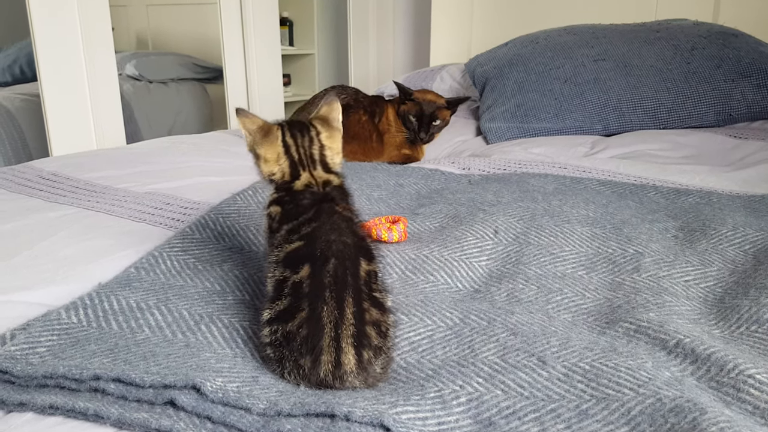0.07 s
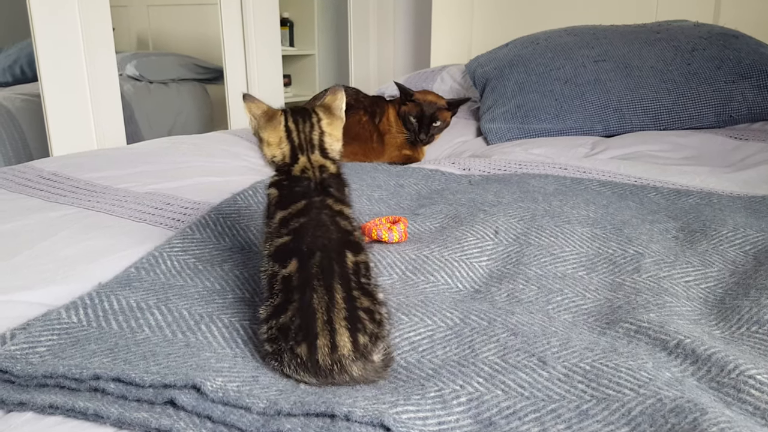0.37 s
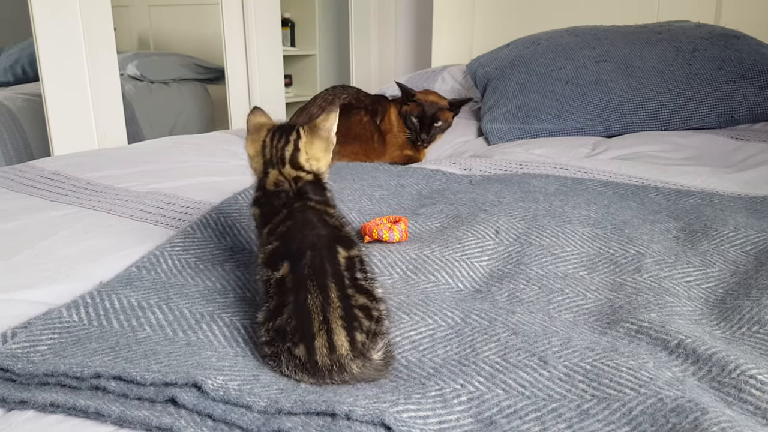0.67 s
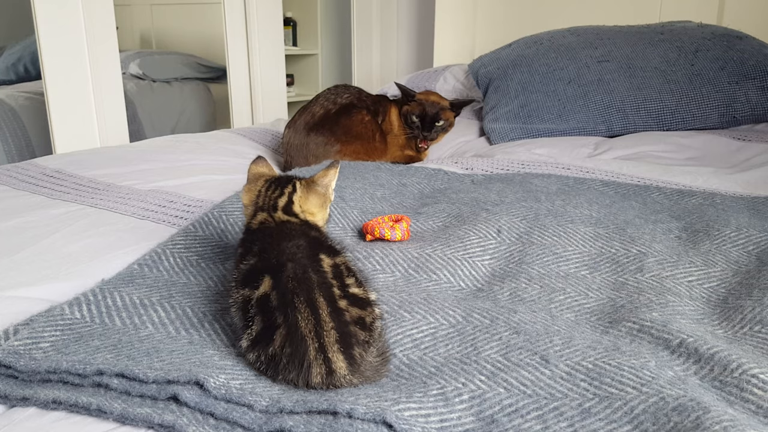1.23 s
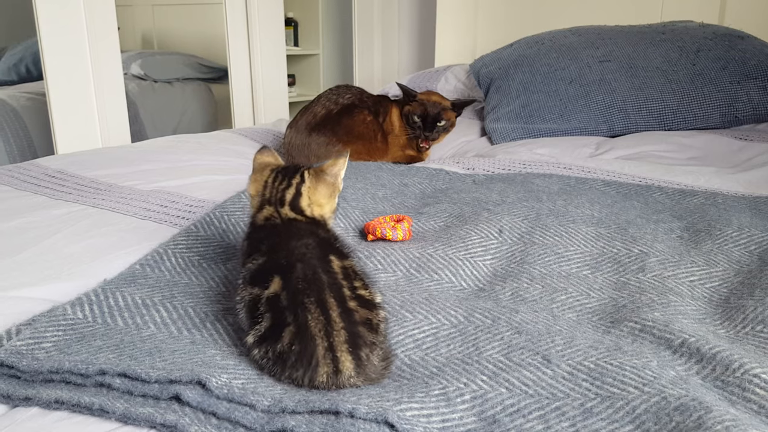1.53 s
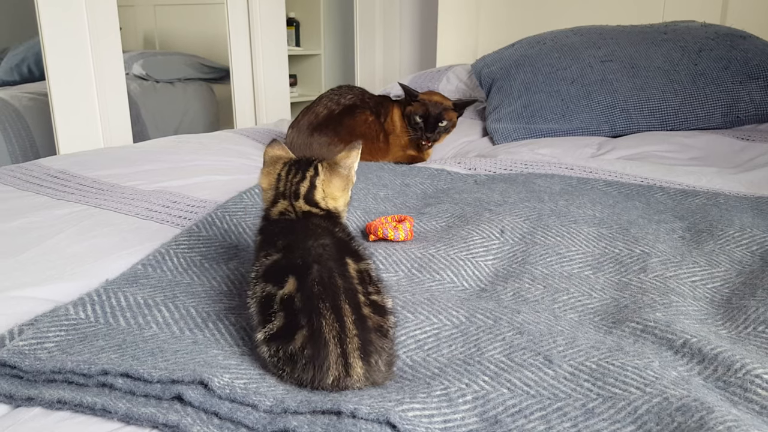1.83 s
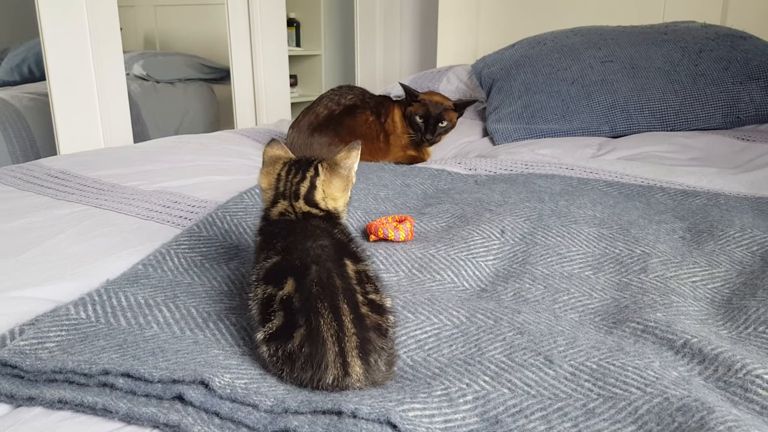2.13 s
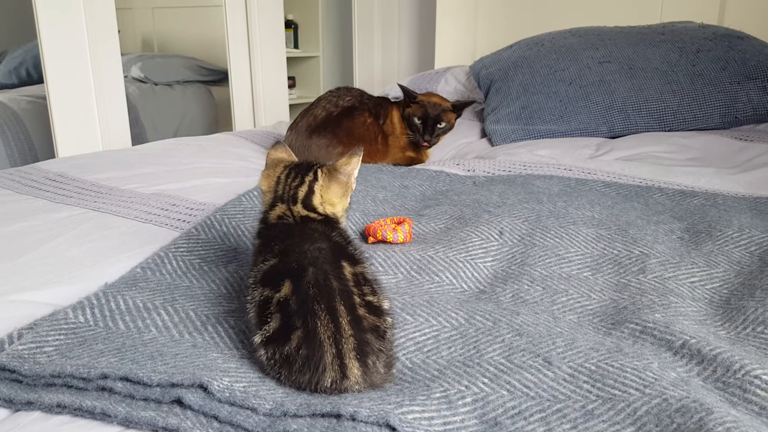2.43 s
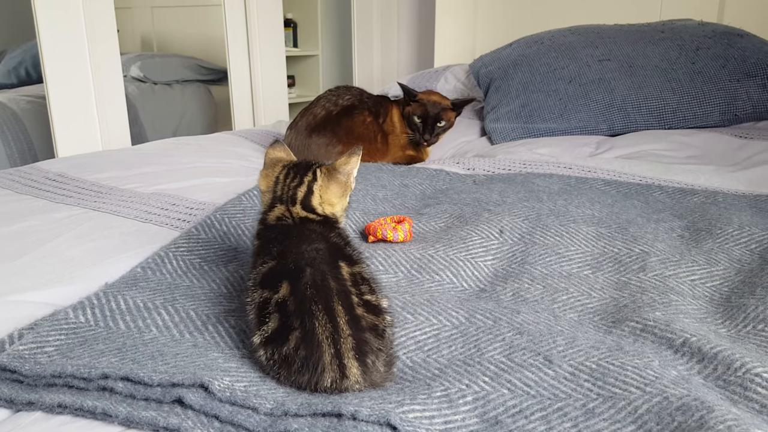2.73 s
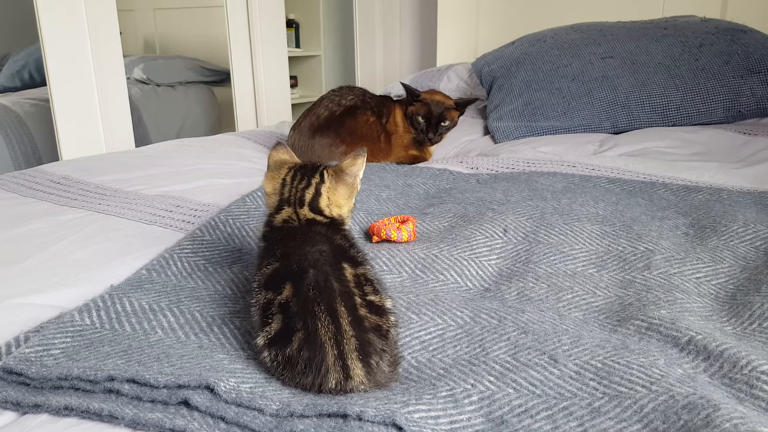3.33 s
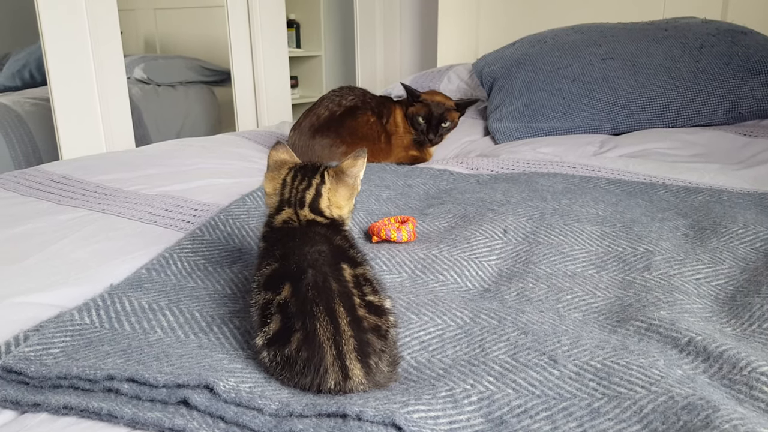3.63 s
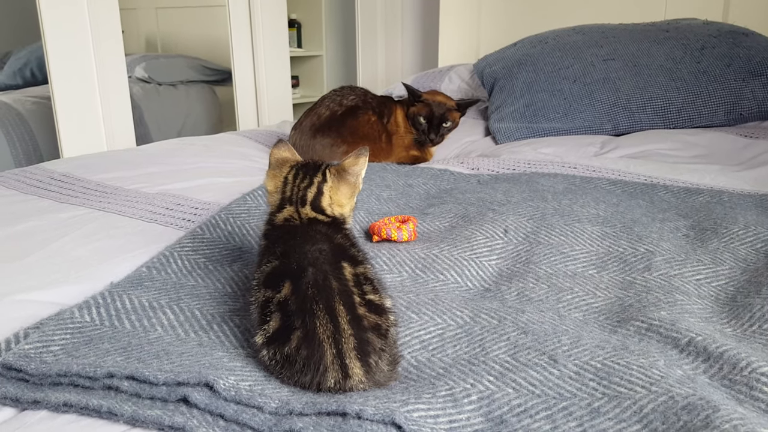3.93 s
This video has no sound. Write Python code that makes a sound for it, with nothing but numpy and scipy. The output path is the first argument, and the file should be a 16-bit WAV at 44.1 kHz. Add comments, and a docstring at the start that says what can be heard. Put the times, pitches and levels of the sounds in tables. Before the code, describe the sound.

A cat hisses once on the right, from about 1 to 2 seconds, breathy with a thin falling tone inside. Before it come soft microphone bumps and a tiny claw snag at 0.4 seconds. Faint lip smacks follow from 2.4 to 3 seconds, then a faint low growl until the end. A loud handling knock hits the left microphone at 3.5 seconds. The quiet bedroom hums slightly throughout.

```python
"""A quiet bedroom, with a faint mains hum. A cat on the bed, off to the right, catches a claw
in the blanket, then hisses once at a kitten: air roars in its throat and sizzles past its teeth,
with a thin falling voice and a fuzzy whistle inside. It smacks its lips and settles into a faint,
low growl. The hand that holds the camera rumbles and knocks on the left microphone."""
import sys
import numpy as np
from scipy import signal
from scipy.fft import rfft, irfft
from scipy.io import wavfile

SR = 44100
rng = np.random.default_rng(int(sys.argv[2]) if len(sys.argv) > 2 else 0)


def dump(signal):
    """Clip the signal to [-1, 1] and save it as 16-bit WAV at the path in sys.argv[1]."""
    limited = np.clip(np.atleast_2d(signal).T, -1, 1)
    pcm = np.round(limited * 32767).astype(np.int16)
    wavfile.write(sys.argv[1], SR, pcm)


N = 176400
T, HZ = np.arange(N) / SR, np.fft.rfftfreq(N, 1 / SR)


def amp(db):
    """Turns decibels into a number to multiply by."""
    return 10 ** (np.asarray(db) / 20)


def unit(x):
    """Scales a sound to an average (rms) level of 1."""
    return x / np.sqrt(np.mean(x ** 2) + 1e-20)


def colour(x, table, column=1):
    """Turns each frequency up or down by one dB column of a table."""
    table = np.array(table)
    db = np.interp(np.log(HZ + 1), np.log(table[:, 0]), table[:, column])
    return irfft(rfft(x) * amp(db), N)


def noise(table, column=1):
    """Noise shaped by a table, at level 1."""
    return unit(colour(rng.standard_normal(N), table, column))


def band(hz, width_hz):
    """Noise gathered around one frequency, at level 1."""
    return unit(irfft(rfft(rng.standard_normal(N)) / (1 + ((HZ - hz) / width_hz) ** 2), N))


def wander(rate_hz):
    """A random drift up and down; a higher rate moves faster."""
    return band(0, rate_hz)


def pitch_and_gain(table):
    """Joins a table's rows into pitch and gain curves, silent before and after."""
    s, hz, db = np.transpose(table)
    return np.interp(T, s, hz), amp(np.interp(T, s, db)) * (T > s[0]) * (T < s[-1])


# The background's tone. Each row: frequency in Hz, left strength in dB, right strength in dB.
AIR_TONE = [(20.3, 3.5, 5), (79, 8.5, 11), (165, 8, 4), (294, 0, 0), (570, -3.5, -4), (970, -7, -1.5),
            (1420, -8, -8), (3030, -12.5, -12.5), (5900, -19, -19), (10300, -25.5, -23),
            (14700, -19.5, -19), (15900, -18, -18.5)]

def room_air():
    """Steady room air and microphone hiss, with a faint mains hum."""
    air_db, hum_db, hum_hz = -66, -77.5, 121.8
    hum = amp(hum_db) * unit(np.sin(2 * np.pi * hum_hz * T + 0.77 * wander(1)))
    return amp(air_db) * np.array([noise(AIR_TONE), noise(AIR_TONE, column=2)]) + hum


# Knocks on the camera. Each row: start in seconds, thump level in dB, starting pitch in Hz,
# rise time in seconds, tap level in dB.
KNOCKS = [(0.043, -45.5, 64.7, 0.0072, -91), (0.094, -41, 71.6, 0.0037, -90),
          (0.174, -37.5, 69, 0.0071, -85), (0.254, -41.5, 99, 0.0039, -80), (0.333, -45, 59.5, 0.0045, -87),
          (0.391, -42.5, 59.5, 0.0074, -87), (1.107, -41.5, 70.5, .005, -83), (1.282, -42, 85, 0.0044, -80),
          (1.576, -43, 80, 0.0043, -80), (3.4627, -16, 252, 0.0025, -36),
          (3.478, -14, 199.5, 0.0036, -39.5), (3.488, -23.5, 155, 0.0045, -58), (3.497, -38, 60, .011, -79),
          (3.854, -34.5, 84, .009, -57)]
# The tones of a tap and of the grip's rumble. Each row: frequency in Hz, strength in dB.
TAP_TONE = [(100, -6.5), (450, 3.5), (680, -1), (1000, -11.5), (1400, -26.5), (2000, -50), (4000, -74)]
RUMBLE_TONE = [(15, 3), (35, -4.5), (65, 2.5), (100, -1.5), (155, -7), (210, -23.5), (280, -35),
               (600, -53.5)]

def hand():
    """The grip rumbles; each knock is a dull tap and a short thump of the case that sags in pitch."""
    pitch_sag, tap_s = 0.33, 0.002
    thumps, taps = np.zeros(N), np.zeros(N)
    for start, db, hz, rise_s, tap_db in KNOCKS:
        age = np.maximum(T - start, 0)
        rise = age / rise_s  # 1 at the top of the swell
        pitch = hz * (rise > 0) * (1 - pitch_sag * (1 - np.exp(-rise / 2)))
        phase = 2 * np.pi * np.cumsum(pitch) / SR
        thumps += amp(db) * (rise * np.exp(1 - rise)) ** 2 * np.sin(phase)
        taps += amp(tap_db) * age / tap_s * np.exp(1 - age / tap_s)
    taps *= noise(TAP_TONE)
    rumble = amp(-55) * unit(noise(RUMBLE_TONE) * amp(2 * wander(15)))
    left = thumps + taps + rumble
    right = amp(-46) * thumps + amp(-21) * taps
    return np.array([left, right])


# A claw catches in the blanket. Each row: start in seconds, level in dB, fade time in seconds.
SNAGS = [(.387, -61.5, 0.0015), (.394, -74, 0.023)]

def claw_snags():
    """A thread snaps off a claw, with a short bright scratch."""
    out = np.zeros(N)
    for start, db, fade_s in SNAGS:
        fade = (T > start) * np.exp(-abs(T - start) / fade_s)
        out += amp(db) * fade * band(8700, width_hz=1000)
    return out


# How hard the cat hisses. Each row: time in seconds, boost in dB at the throat, then at the teeth.
HISS_FORCE = [(.92, -42, -28), (1.11, -20.5, -12), (1.21, -14, -7.5), (1.28, -8, -4.5), (1.34, -3.5, -2),
              (1.47, -2, -1), (1.61, -2, 0.5), (1.69, -3, -3.5), (1.799, -3.5, -4), (1.875, -9, -6),
              (1.92, -17.5, -19), (1.98, -40, -45)]
# The tones of the throat's roar and the sizzle at the teeth. Each row: frequency in Hz,
# strength in dB with the mouth wide open, then with it narrowed.
THROAT_TONE = [(90, -42, -13), (198, -10.5, -10.5), (380, -4, 4), (460, -10.5, -11.5), (705, -0.5, -3),
               (1000, -4, -11), (1090, -6.5, -13.5), (1800, -8.5, -18.5), (2380, -14.5, -26),
               (3250, -15, -17.5), (3700, -23.5, -31), (5330, -42, -29), (9000, -39, -47)]
TEETH_TONE = [(2500, -45, -48), (4200, -22, -26.5), (5500, -22.5, -27), (6150, -15.5, -21),
              (7140, -31, -28), (7700, -19, -26), (8200, -24.5, -28), (8950, -20.5, -26),
              (9900, -27.5, -24), (11900, -32, -28), (12900, -26, -32), (14400, -31, -34),
              (15800, -28.5, -42)]

def hiss():
    """Air roars in the throat and sizzles past the teeth; both change tone as the mouth narrows."""
    s, throat_db, teeth_db = np.transpose(HISS_FORCE)
    halfway_s, narrowing_s = 1.665, 0.22
    narrow = np.clip(.5 + (T - halfway_s) / narrowing_s, 0, 1)
    flutter_db = .7 * wander(30)
    out = np.zeros(N)
    for tone, db in [(THROAT_TONE, throat_db - 52.5), (TEETH_TONE, teeth_db - 64.5)]:
        wide_flow = np.sqrt(1 - narrow) * noise(tone)
        narrow_flow = amp(-0.5) * np.sqrt(narrow) * noise(tone, column=2)
        gain = amp(np.interp(T, s, db) + flutter_db) * (T > s[0]) * (T < s[-1])
        out += gain * (wide_flow + narrow_flow)
    return out


# The voice inside the hiss. Each row: time in seconds, pitch in Hz, strength in dB.
VOICE = [(1.27, 262.8, -77), (1.32, 288.9, -55.5), (1.355, 287.2, -66), (1.39, 271.6, -54),
         (1.42, 265.1, -63), (1.455, 266.4, -57), (1.5, 245.6, -55.5), (1.545, 221.7, -54.5),
         (1.6, 235.6, -47), (1.66, 222.8, -55), (1.7, 211.8, -71)]
# How the throat shapes the voice. Each row: frequency in Hz, boost or cut in dB.
VOICE_TONE = [(230, 0), (290, -4.5), (420, -8), (490, -11.5), (570, -1), (670, -5.5), (810, -3.5),
              (900, -14.5), (1000, 0.5), (1150, -22), (1350, -18.5), (1700, -26)]

def voice():
    """The vocal folds flutter weakly in the rushing air, and the throat shapes their overtones."""
    pitch_wobble, flutter_db = 0.01566, 3.5
    hz, gain = pitch_and_gain(VOICE)
    phase = 2 * np.pi * np.cumsum(hz * (1 + pitch_wobble * wander(71))) / SR
    folds = sum(amp(flutter_db * wander(6)) * np.sin(k * phase) for k in range(1, 8))
    return gain * colour(folds, VOICE_TONE)


# The throat's sinking note. Each row: time in seconds, pitch in Hz, level in dB.
WHISTLE = [(1.3, 860, -76), (1.39, 812, -56.5), (1.46, 790, -60), (1.54, 675, -54), (1.63, 680, -57),
           (1.7, 650, -63.5), (1.87, 650, -72)]

def throat_whistle():
    """Air makes the throat ring at one note, a fuzzy whistle that glides down."""
    width_hz = 32
    hz, gain = pitch_and_gain(WHISTLE)
    phase = 2 * np.pi * np.cumsum(hz) / SR
    return gain * unit(wander(width_hz) * np.cos(phase) + wander(width_hz) * np.sin(phase))


# Lip smacks and licks. Each row: start in seconds, length in seconds, the mouth's note in Hz,
# its level in dB, crackle level in dB.
SMACKS = [(2.432, 0.073, 1500, -82, -72.5), (2.523, 0.046, 1620, -68.5, -72.5), (2.56, .03, 1700, -86, -75),
          (2.747, 0.06, 1790, -65.5, -76), (2.796, 0.069, 1900, -86, -75), (2.893, 0.057, 1610, -72, -92),
          (2.951, 0.058, 1340, -68.5, -72.5)]
# The wet crackle's tone. Each row: frequency in Hz, strength in dB.
CRACKLE_TONE = [(1500, -4), (4500, -6), (5800, 0), (6900, -11), (8500, -6), (11000, -13), (15000, -16)]

def lip_smacks():
    """Each lick makes the hollow of the mouth ring under a fine wet crackle."""
    out = np.zeros(N)
    for start, length, hz, mouth_db, crackle_db in SMACKS:
        swell = np.sin(np.pi * np.clip((T - start) / length, 0, 1) ** 0.45)  # quick in, slower out
        mouth = amp(mouth_db) * band(hz, width_hz=340)
        crackle = amp(crackle_db) * unit(noise(CRACKLE_TONE) * amp(4.3 * wander(200)))
        out += swell * (mouth + crackle)
    return out


# The growl. Each row: time in seconds, pulses per second, level in dB.
GROWL = [(3.02, 85.2, -80), (3.11, 83.8, -65), (3.2, 81.5, -57), (3.29, 72.36, -65), (3.4, 75.36, -60.5),
         (3.49, 72, -60), (3.66, 73.82, -66.5), (3.84, 75.92, -61), (4, 73.7, -63)]
# How the throat shapes the growl. Each row: frequency in Hz, strength in dB.
GROWL_TONE = [(60, -31.5), (115, -15), (150, 0), (172, -7.5), (195, -3), (228, -4.5), (275, -18),
              (320, -12), (385, -10), (430, -28), (580, -23), (800, -46), (1500, -51.5)]

def growl():
    """Slow, uneven pulses in the throat behind a closed mouth."""
    rate_wobble, uneven_db = .075, 2.5
    hz, gain = pitch_and_gain(GROWL)
    pulse_count = np.floor(np.cumsum(hz * (1 + rate_wobble * wander(40))) / SR)
    pulses = np.diff(pulse_count, prepend=0) * amp(uneven_db * rng.standard_normal(N))
    return gain * unit(colour(pulses, GROWL_TONE))


# The echo's tone. Each row: frequency in Hz, boost or cut in dB.
ECHO_TONE = [(200, -11), (700, -4), (1200, 0), (16000, 0.5)]

def with_echo(x):
    """Adds a short, soft bedroom echo, light in the bass."""
    fade_s = 0.14  # time to fall by 60 dB
    t = T[:SR // 2]
    tail = rng.standard_normal(len(t)) * amp(-60 * t / fade_s) * (t > .003)
    echo = signal.fftconvolve(x, tail / np.linalg.norm(tail))[:N]
    return x + amp(-4) * colour(echo, ECHO_TONE)


# How the cat sounds on the left, its far side. Each row: frequency in Hz, boost or cut in dB.
FAR_SIDE = [(100, 8.5), (240, -14.5), (400, -15), (750, -22), (2400, -33.5), (8000, -27), (15000, -25)]

def scene():
    """The cat to the right, the hand on the left, room air all round."""
    cat = hiss() + throat_whistle() + voice() + growl() + lip_smacks() + claw_snags()
    left = colour(with_echo(cat), FAR_SIDE)
    right = with_echo(cat)
    return np.array([left, right]) + hand() + room_air()


def record(dry):
    """Cuts off the very highest treble, above 15750 Hz."""
    treble_cut = signal.firwin(701, 15750, window=("kaiser", 9), fs=SR)
    return signal.oaconvolve(dry, treble_cut[None], "same")


dry = scene()
out = record(dry)
dump(out)
```